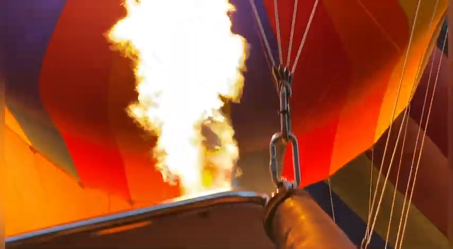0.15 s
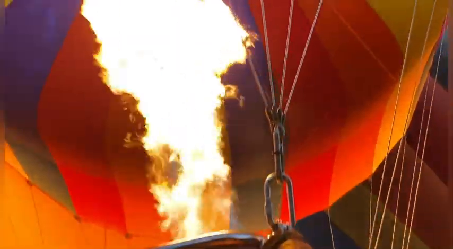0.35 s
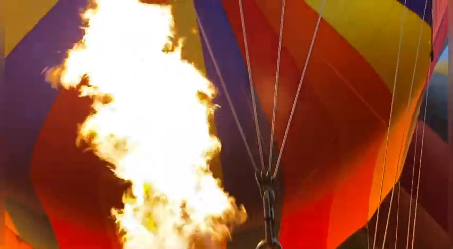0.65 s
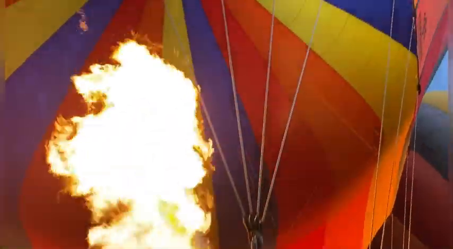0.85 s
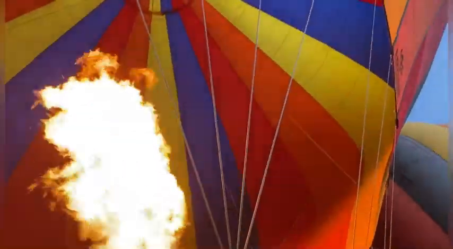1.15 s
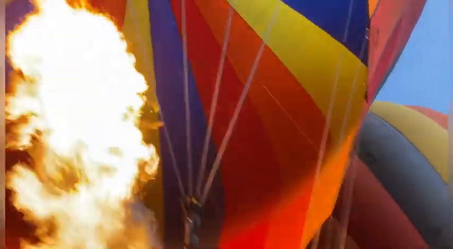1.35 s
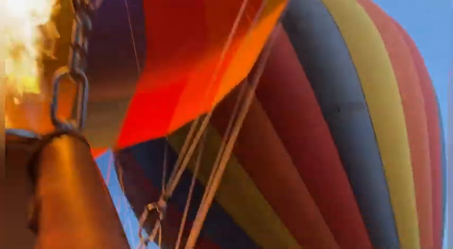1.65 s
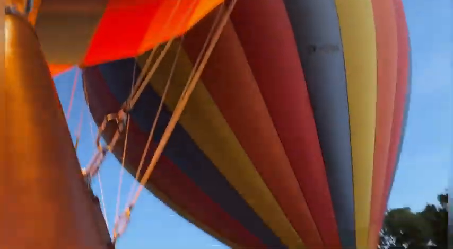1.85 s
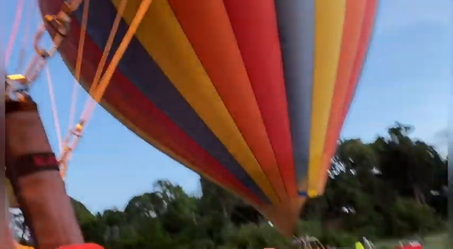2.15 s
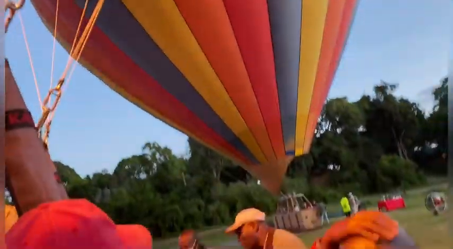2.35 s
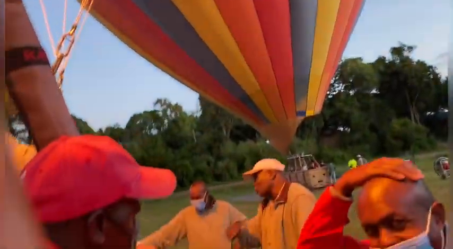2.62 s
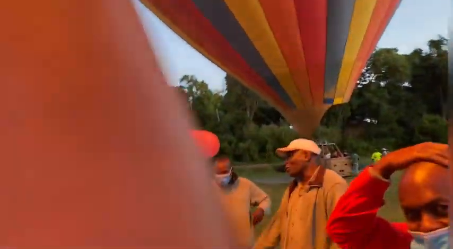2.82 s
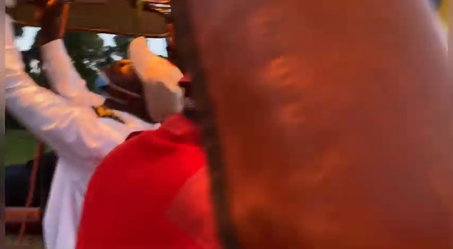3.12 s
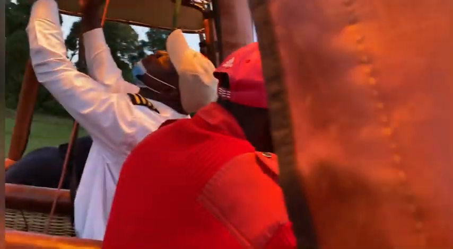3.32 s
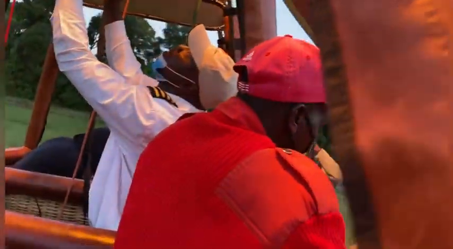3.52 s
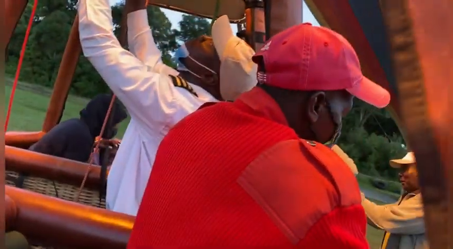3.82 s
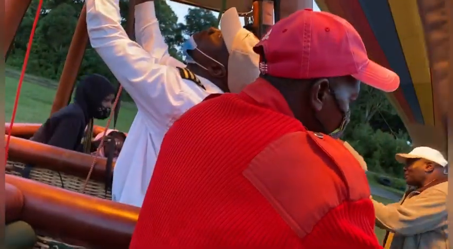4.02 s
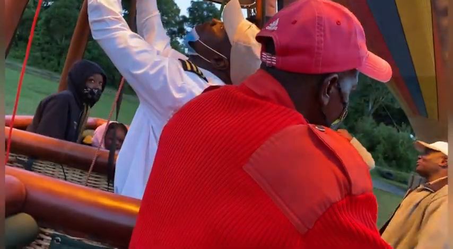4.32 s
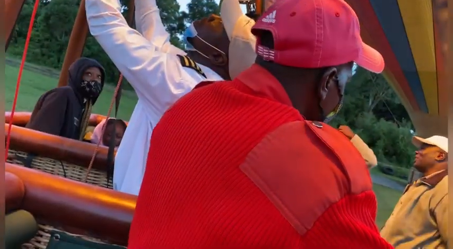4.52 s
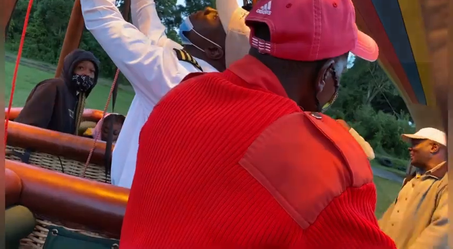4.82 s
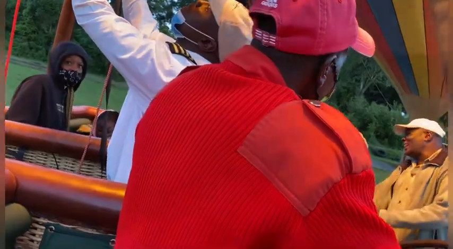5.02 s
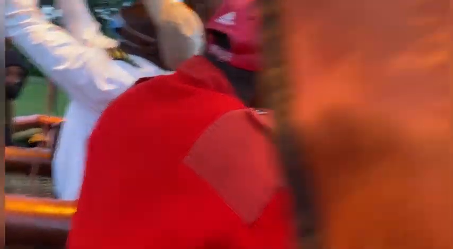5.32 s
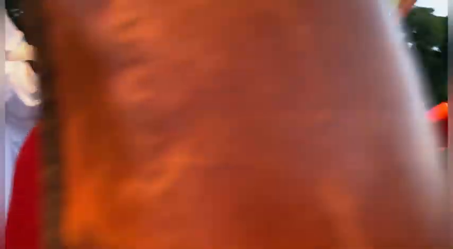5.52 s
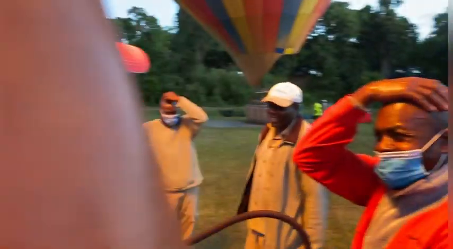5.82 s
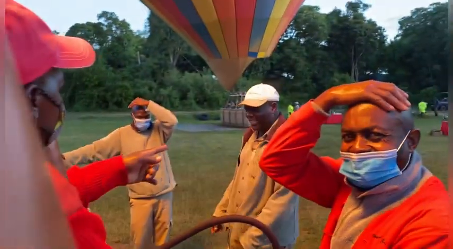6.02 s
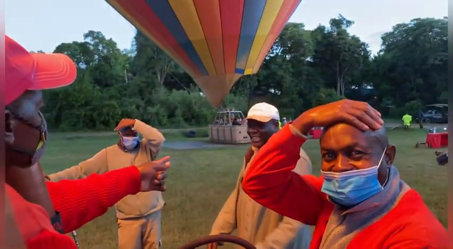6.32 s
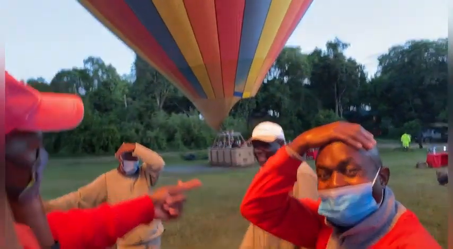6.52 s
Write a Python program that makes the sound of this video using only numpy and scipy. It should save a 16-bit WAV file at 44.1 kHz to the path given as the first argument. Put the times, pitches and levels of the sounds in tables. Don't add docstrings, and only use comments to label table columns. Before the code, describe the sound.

A propane burner is already firing at the start and continues to the end, about 6.7 seconds, very close overhead outdoors. Its steady noise has three layers: a deep, slightly trembling roar, a broad middle rush of air, and a grainy high gas hiss. From 0 to 1.3 seconds it is full and fairly bright. From 1.5 the handheld stereo microphone swings away and the hiss gradually dulls, softest near 2.8. Around 3.1 it quickly comes back, brightest near 3.7 with a small swell in the roar, then holds fairly steady until 5.3. By 5.7 to 5.9 the treble is strongly shaded, leaving a darker rush and rumble; it partly returns by the end while the low roar eases slightly. Very short reflections make the colour slide hollowly with each turn. Treble spreads wide; no separate events interrupt the blast.

```python
import sys
import numpy as np
from scipy import signal
from scipy.io import wavfile
from scipy.ndimage import uniform_filter1d, map_coordinates

SR = 44100
rng = np.random.default_rng(int(sys.argv[2]) if len(sys.argv) > 2 else 0)


def wrap_up_sound(samples):
    columns = np.atleast_2d(samples).T
    tamed = np.clip(columns, -1, 1)
    steps = np.round(tamed * 32767).astype(np.int16)
    wavfile.write(sys.argv[1], SR, steps)


def to_linear_factor(level_db):
    exponent = np.asarray(level_db, float) / 20
    return 10 ** exponent


N = 293706

FRAME, HOP = 1024, 256
HZ = np.fft.rfftfreq(FRAME, 1 / SR)[:, None]
S = np.arange(-(-N // HOP) + 1) * HOP / SR


def frames(x):
    return signal.stft(x, nperseg=FRAME, noverlap=FRAME - HOP)[2]


def samples(z):
    return signal.istft(z, nperseg=FRAME, noverlap=FRAME - HOP)[1][..., :N]


def unit(x):
    return x / np.sqrt(np.mean(np.abs(x) ** 2))


def along(points):
    hz, db = np.transpose(points)
    return to_linear_factor(np.interp(np.log(HZ + 1), np.log(hz), db))


def curve(points):
    s, value = np.transpose(points)
    return np.interp(S, s, value)


def posed(values):
    # (time [s], place along the poses [0 = first])
    pan_points = [(0.0, 0.05), (0.9, 0.15), (1.25, 0.18), (1.55, 0.56), (1.85, 0.83), (2.1, 0.93),
                  (2.6, 1.15), (2.9, 1.47), (3.15, 1.7), (3.5, 2.66), (3.9, 3.03), (4.5, 3.05), (5.0, 3.05),
                  (5.4, 3.91), (5.7, 4.71), (6.3, 5.0), (6.66, 4.84)]
    return np.interp(curve(pan_points), np.arange(len(values)), values)


def wobble(rate_hz):
    return map_coordinates(rng.standard_normal(size=400), [S * rate_hz])


def eddies(depth_db, size):
    field = rng.standard_normal((len(HZ), len(S)))
    field = uniform_filter1d(field, size[0], axis=0)
    field = uniform_filter1d(field, size[1], axis=1)
    return to_linear_factor(depth_db * unit(field))


def flame_roar():
    # (time [s], level [dB])
    flame_level = [(0.0, -17.5), (0.3, -19.5), (1.2, -19), (2.2, -18.5), (3.3, -19), (3.62, -18.5),
                   (3.7, -16.5), (4.0, -18.5), (5.2, -19), (5.9, -19), (6.66, -21)]
    # (frequency [Hz], level per hertz [dB])
    roar_spectrum = [(15, -18), (40, -3.5), (60, 6), (80, 1.5), (130, -3), (220, -5.5), (400, -11.5),
                     (700, -21.5), (1500, -38)]
    return to_linear_factor(curve(flame_level) + 0.46 * wobble(14)) * unit(along(roar_spectrum))


def air_rush(flutter):
    rush_level = [
        -25.5,
        -24.5,
        -27,
        -26.5,
        -27,
        -26,
    ]
    # (frequency [Hz], level per hertz [dB])
    rush_spectrum = [(150, -57), (350, 0.5), (540, 2), (660, -1), (1000, -5.5), (1200, -7), (1600, -8.5),
                     (2200, -12), (3200, -14.5), (5000, -19.5), (9000, -31.5)]
    level_db = posed(rush_level) + 1.0 + 0.3 * flutter + 0.35 * wobble(6)
    return to_linear_factor(level_db) * unit(along(rush_spectrum)) * eddies(0.79, size=(8, 10))


def jet_hiss(flutter):
    # (time [s], level [dB])
    shade_level = [(0.0, -0.5), (0.35, -2.5), (0.63, -2), (1.1, -3.5), (1.6, -6), (2.0, -7.5), (2.8, -9),
                   (3.1, -2), (3.45, -1.5), (3.72, 1), (4.1, -0.3), (5.3, -0.9), (5.67, -8.5), (5.9, -11.5),
                   (6.3, -9.5), (6.66, -6.5)]
    # (frequency [Hz], level per hertz [dB])
    hiss_spectrum = [(800, -21), (2000, 0.5), (3500, -4.5), (5000, -1.5), (6400, 1), (7500, 1),
                     (10000, -0.5), (13000, -1), (16000, 0)]
    jet_db = -28.5
    level_db = jet_db + curve(shade_level) + 3 + 0.5 * flutter + 0.77 * wobble(5.4)
    fine = eddies(0.76, size=(30, 8))
    lasting = eddies(1.36, size=(7, 50))
    return to_linear_factor(level_db) * unit(along(hiss_spectrum)) * fine * lasting


def burner():
    flutter = wobble(11) + wobble(30)
    return np.sqrt(flame_roar() ** 2 + air_rush(flutter) ** 2 + jet_hiss(flutter) ** 2)


def delay(ms):
    return np.exp(-2j * np.pi * HZ * ms * 1e-3)


def echoes(routes):
    smear_hz = 3510
    return sum(share * delay(ms) for ms, share in routes) / (1 + (HZ / smear_hz) ** 8)


def paths(poses):
    return [(posed(ms), posed(share)) for ms, share in np.transpose(poses, axes=(1, 2, 0))]


def port_responses():
    # (delay [ms], share [ratio])
    left_paths = [
        [(0.12, 1.21), (0.28, 0.17), (1.19, -0.03), (1.86, 0.09), (0.42, -0.01)],
        [(0.16, 1.03), (0.45, 0.14), (1.28, 0.25), (2.05, -0.15), (1.17, -0.11)],
        [(0.22, 0.46), (0.4, 0.41), (1.18, 0.27), (2.18, 0.12), (0.66, -0.02)],
        [(0.34, 0.42), (0.26, -0.11), (1.03, 0.15), (2.08, 0.15), (0.7, 0.14)],
        [(0.3, 0.62), (0.51, 0.22), (1.09, 0.15), (2.05, -0.08), (0.18, -0.07)],
        [(0.15, 0.54), (0.43, 0.24), (1.23, 0.38), (2.03, -0.03), (0.67, 0.04)],
    ]
    # (delay [ms], share [ratio])
    right_paths = [
        [(0.09, 1.89), (0.55, 0.02), (0.53, 0.02), (0.98, -0.08), (1.74, -0.16), (2.23, -0.05)],
        [(0.3, 0.82), (0.5, 0.72), (1.02, 0.48), (1.5, 0.44), (2.06, -0.11), (2.59, 0.12)],
        [(0.21, 0.77), (0.48, 0.35), (0.55, 0.3), (1.1, 0.28), (1.91, -0.03), (2.22, 0.06)],
        [(0.09, 0.65), (0.53, 1.15), (0.58, -1.05), (0.98, 0.24), (1.75, -0.16), (2.63, 0.14)],
        [(0.21, 0.74), (0.51, 0.24), (0.62, 0.24), (1.22, 0.19), (1.8, -0.14), (2.25, 0.03)],
        [(0.35, 1.0), (0.59, 0.2), (0.87, 0.37), (1.34, 0.38), (1.89, -0.15), (3.03, -0.01)],
    ]
    shade_hz, alike_hz = 2500, 80.4
    (lag_ms, gain), *right = paths(right_paths)
    bent = gain * delay(lag_ms) / (1 + (HZ / shade_hz) ** 2)
    ports = np.array([1 + echoes(paths(left_paths)), bent + echoes(right)])
    ports += (ports.mean(axis=0) - ports) / (1 + (HZ / alike_hz) ** 2)
    power = np.mean(np.abs(ports) ** 2, axis=0)
    return ports / np.sqrt(uniform_filter1d(power, size=45, axis=0))


def add_scatter(direct, common, apart):
    # (frequency [Hz], level re direct [dB])
    scatter_spectrum = [(50, -13), (300, -15), (650, -11), (1200, -14), (2100, -9), (3100, -4), (4200, 1),
                        (5500, 0), (7000, -2)]
    share, low_hz, high_hz = 0.75, 3200, 5300
    shared = share * HZ ** 8 / (HZ ** 8 + low_hz ** 8) / (1 + (HZ / high_hz) ** 8)
    gain = along(scatter_spectrum)
    scattered = gain * (np.sqrt(shared) * common + np.sqrt(1 - shared) * np.array(apart))
    return (direct + scattered) / np.sqrt(1 + gain ** 2)


def scene():
    direct, common, *apart = frames(rng.standard_normal((4, N)))
    return samples(burner() * add_scatter(port_responses() * direct, common, apart))


def widen(z):
    widen_hz, in_step_hz, turn_hz = 6640, 6950, 4120
    turn = np.pi * (HZ - in_step_hz) / turn_hz
    turn = turn - 0.14 * np.sin(4 * turn)
    mid = np.cos(turn) * z[0]
    side = -1j * np.sin(turn) * (0.7 * z[0] + 1.4 * z[1])
    true_stereo = 1 / (1 + np.exp((HZ - widen_hz) / 330))
    return true_stereo * z + (1 - true_stereo) * np.array([mid + side, mid - side])


def low_pass(x):
    return signal.sosfilt(signal.butter(12, 17060, fs=SR, output="sos"), x)


def record(dry):
    low_cut_hz, top_hz = 51.8, 15740
    low_cut = signal.butter(3, low_cut_hz, "high", fs=SR, output="sos")
    z = frames(signal.sosfilt(low_cut, dry)) * (HZ < top_hz)
    mix = samples(widen(z))
    return low_pass(mix)


dry = scene()
out = record(dry)
wrap_up_sound(out)
```